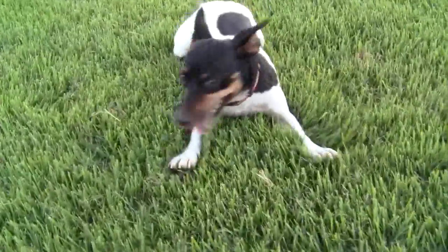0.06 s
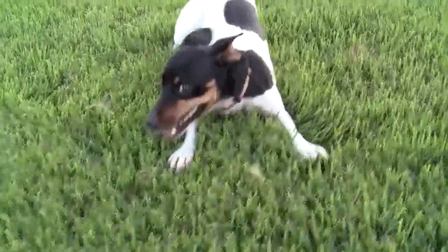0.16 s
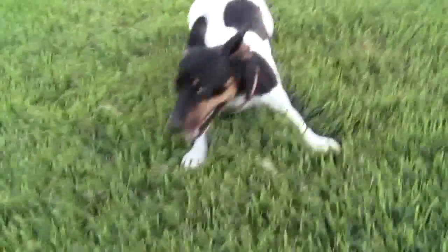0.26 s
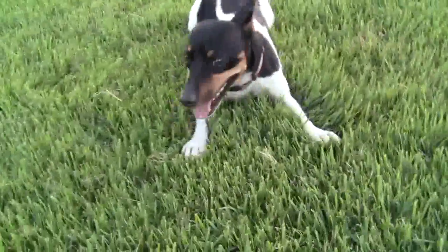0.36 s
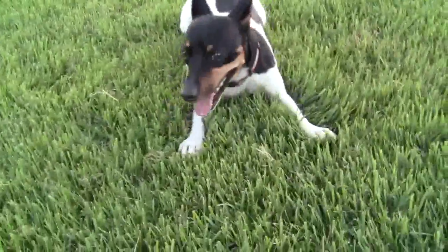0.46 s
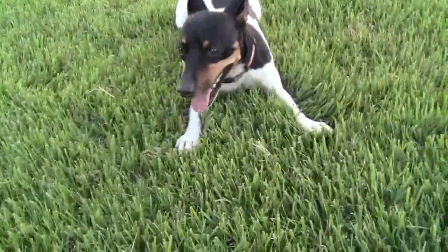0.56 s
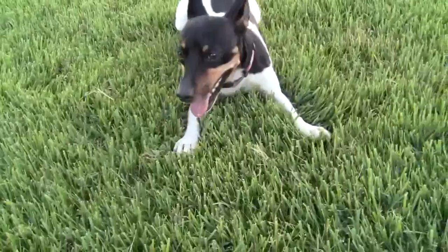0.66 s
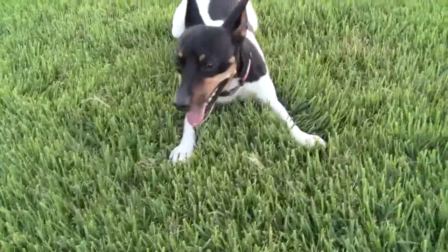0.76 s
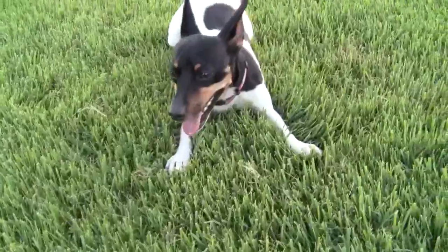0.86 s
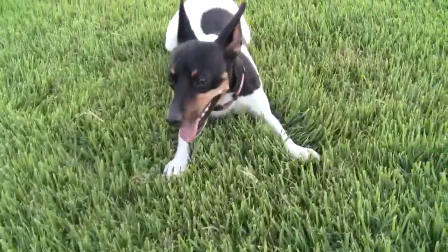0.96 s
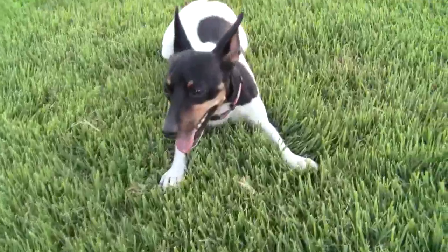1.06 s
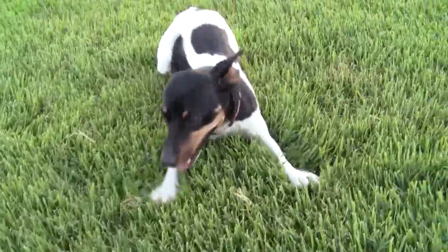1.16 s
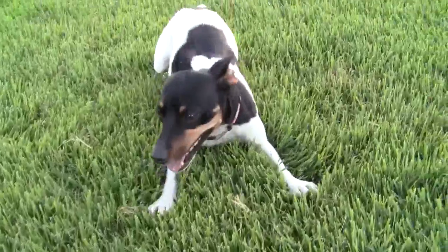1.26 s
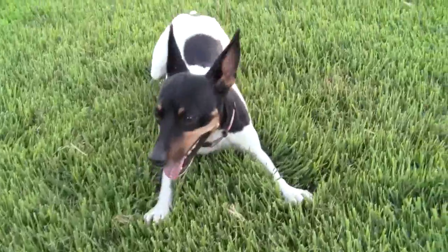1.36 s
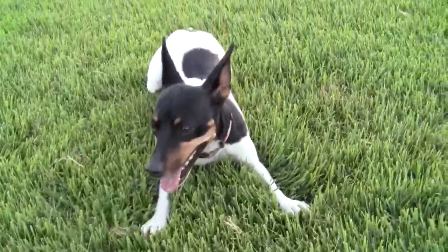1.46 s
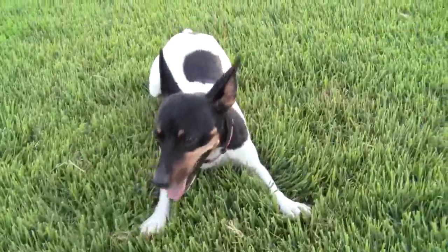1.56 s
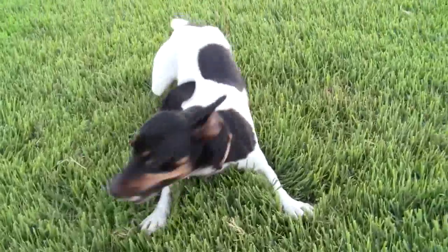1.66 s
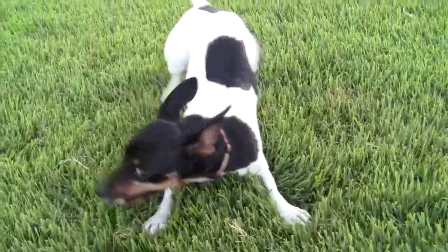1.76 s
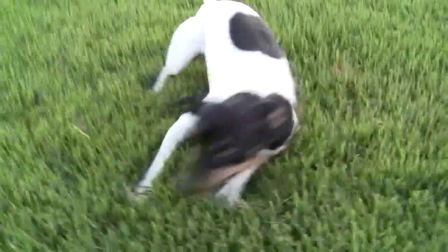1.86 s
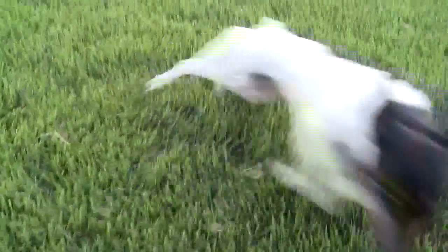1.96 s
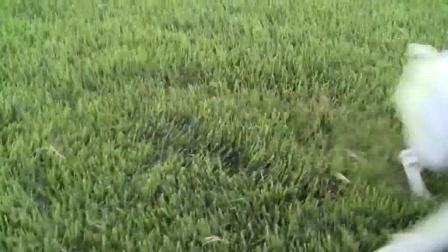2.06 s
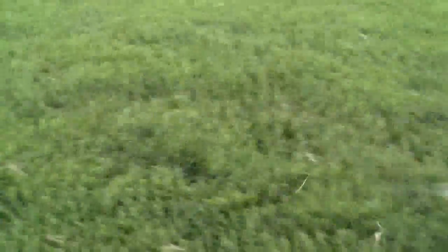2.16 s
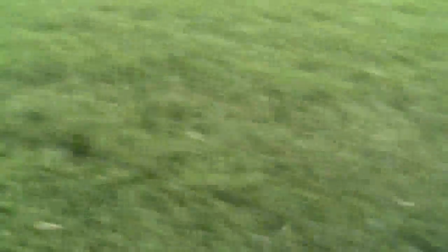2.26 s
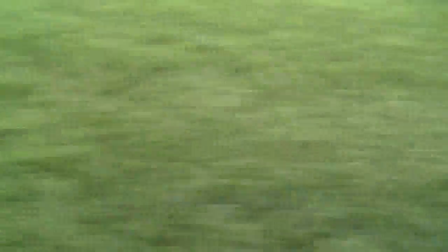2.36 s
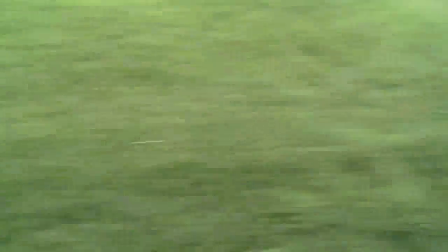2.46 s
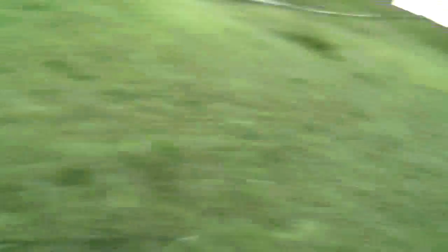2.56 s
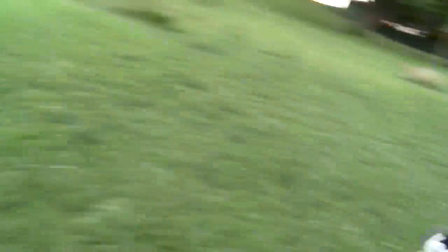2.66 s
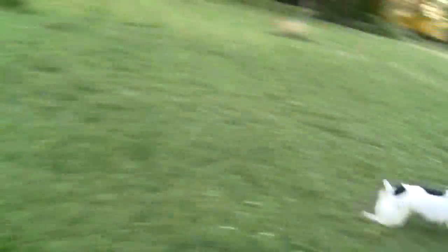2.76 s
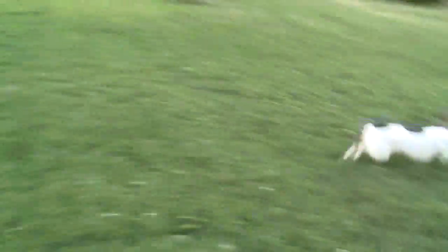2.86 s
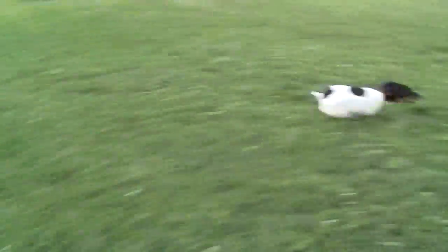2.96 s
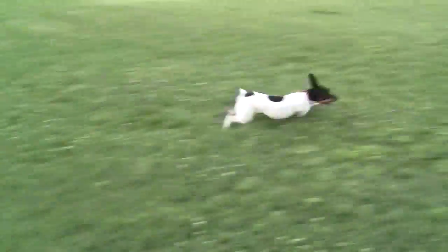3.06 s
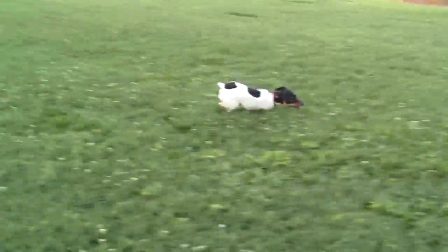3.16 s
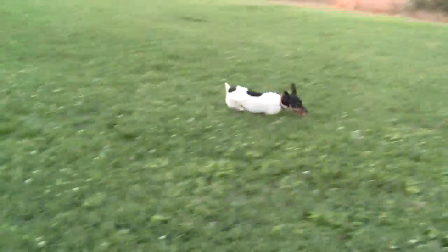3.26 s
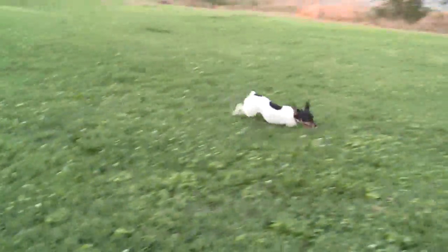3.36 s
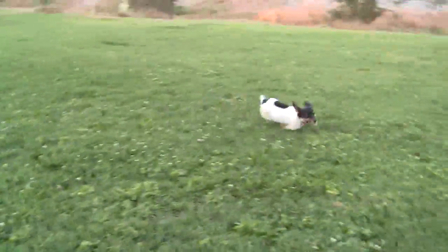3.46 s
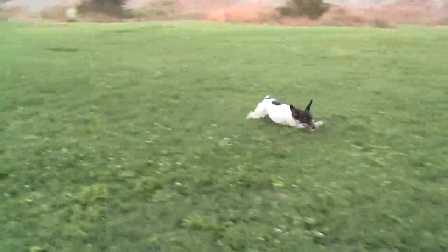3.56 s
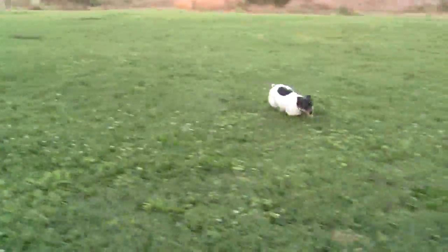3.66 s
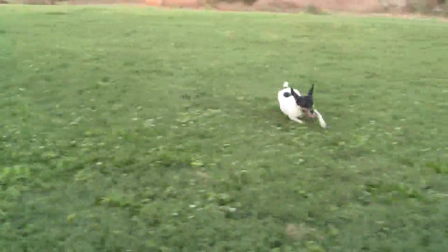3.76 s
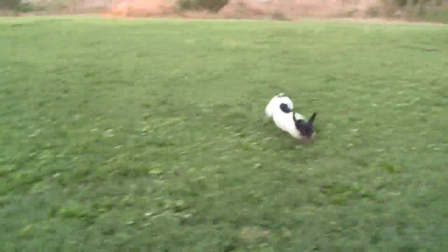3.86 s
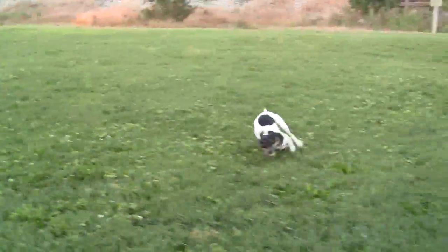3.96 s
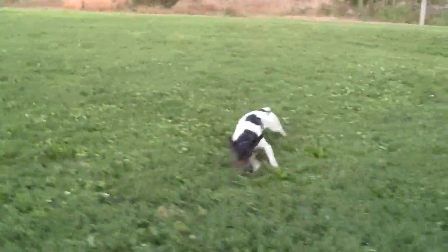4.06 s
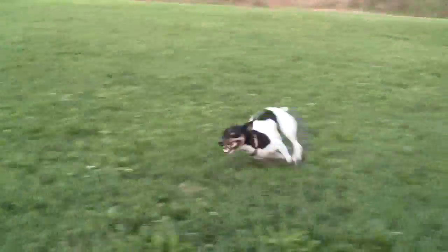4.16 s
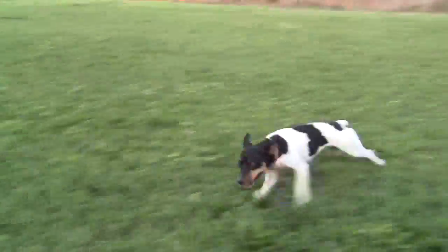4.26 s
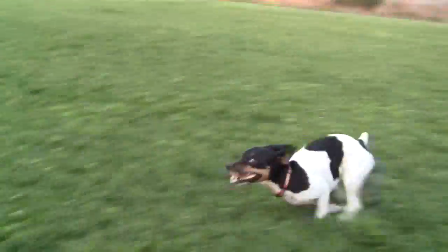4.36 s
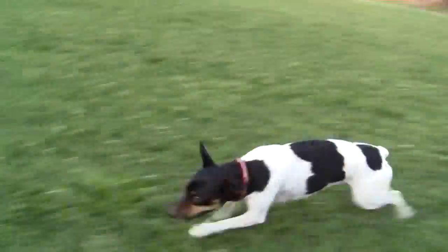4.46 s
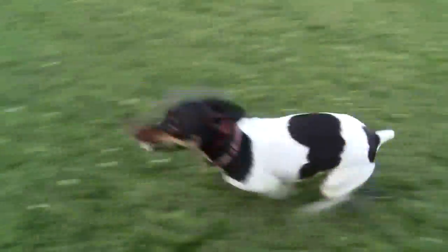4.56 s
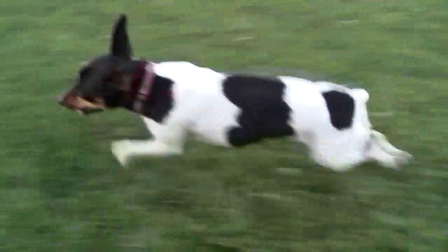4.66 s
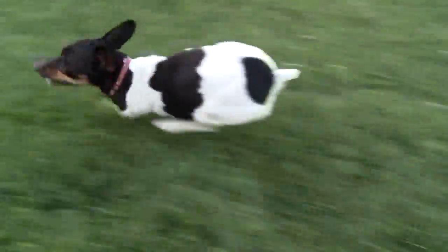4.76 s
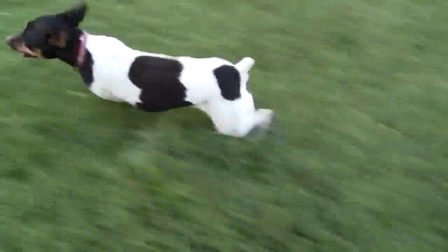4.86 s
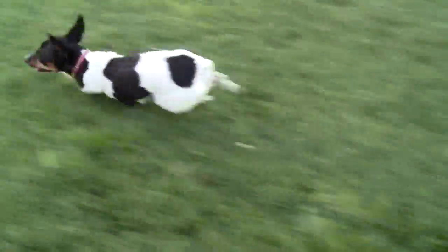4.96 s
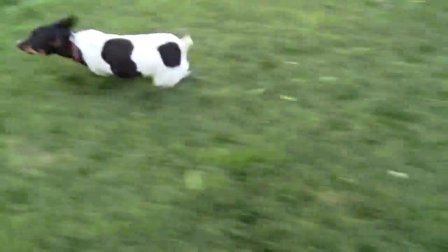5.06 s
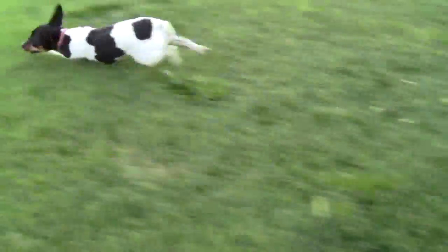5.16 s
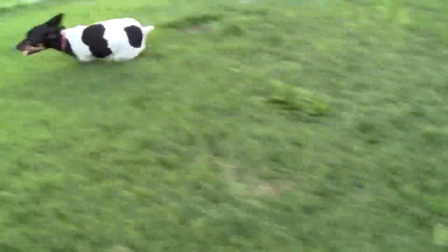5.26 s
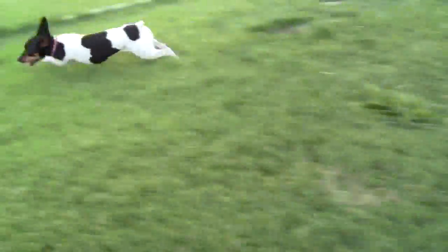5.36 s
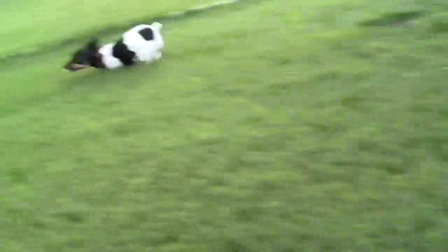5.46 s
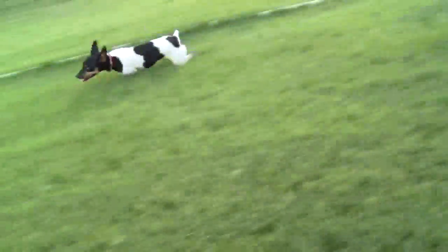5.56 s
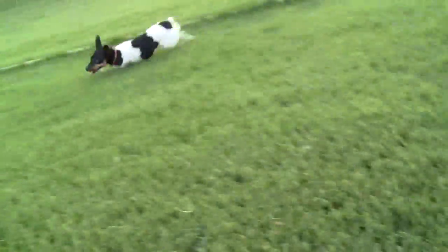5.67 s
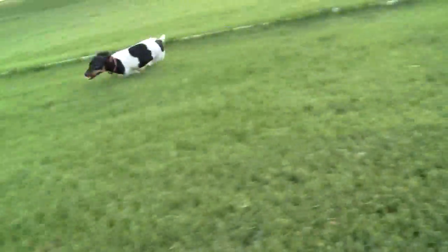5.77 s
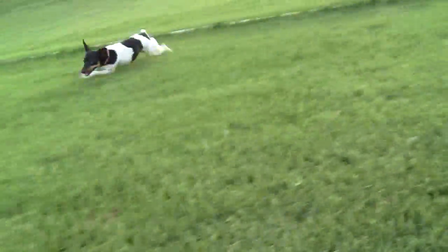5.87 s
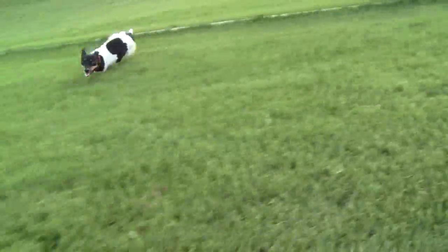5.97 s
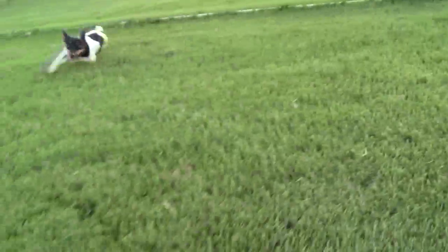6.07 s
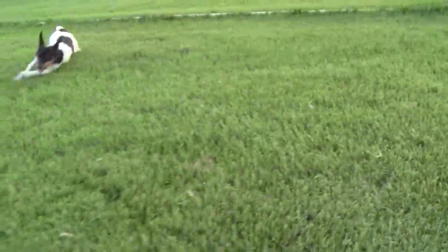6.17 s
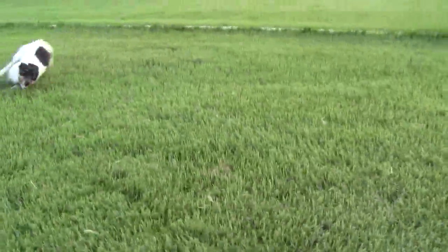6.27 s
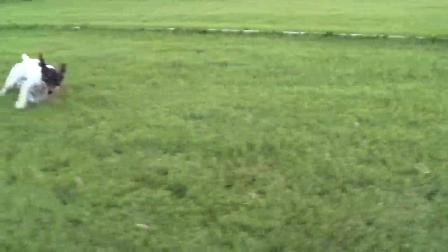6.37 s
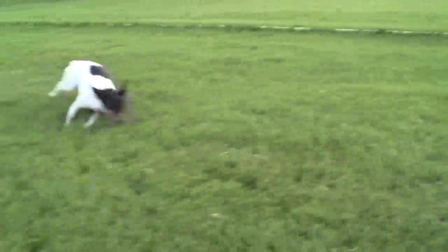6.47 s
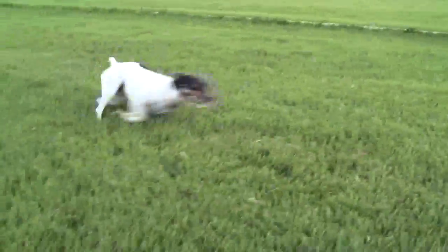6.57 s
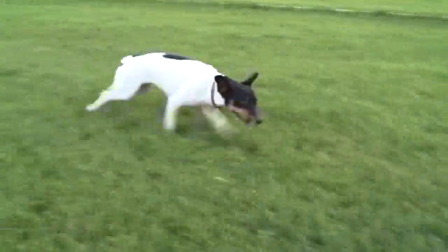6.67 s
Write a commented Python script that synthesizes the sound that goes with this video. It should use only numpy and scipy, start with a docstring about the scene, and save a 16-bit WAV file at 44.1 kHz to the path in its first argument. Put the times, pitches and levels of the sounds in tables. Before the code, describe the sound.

A small dog huffs on a lawn, gives one short gruff growl, then gallops through crackling grass as wind buffets the microphone.

```python
"""A small dog plays on a lawn: it huffs, lunges with one gruff growl, then gallops about, huffing as it runs.
Huffs are noise through airway resonances; the growl is rough pulses through the chest.
Grass crackles in tiny ticks and swishes as dull noise; stalks snap and the turf thuds.
Wind noise buffets the microphone in two spells as it swings after the dog.
A small bird twitters far away in gliding whistles, over a quiet bed of outdoor air."""
import sys
import numpy as np
from scipy import signal
from scipy.fft import rfft, irfft
from scipy.io import wavfile
from scipy.ndimage import uniform_filter1d, minimum_filter1d

SR = 44100
rng = np.random.default_rng(int(sys.argv[2]) if len(sys.argv) > 2 else 0)


def int16_out(signal):
    """Quantize to a 16-bit WAV file."""
    q = np.round(np.clip(np.atleast_2d(signal).T, -1, 1) * 32767)
    wavfile.write(sys.argv[1], SR, q.astype(np.int16))


N = 296773
TIME, HZ = np.arange(N) / SR, np.fft.rfftfreq(N, 1 / SR)

# The dog's huffs. Each row: peak in seconds, rise width in seconds, fall width in seconds, level in dB,
# mouth opening 0-1, throat against mouth in dB, teeth against mouth in dB.
HUFFS = [(0.186, 0.018, 0.02, -34, 0.24, -6, -4), (0.211, .0026, 0.013, -29.5, 0.076, -22, -9),
         (0.269, .003, .009, -37.5, 0.092, -13, -6.5), (0.386, 0.0031, .0045, -27, 0.13, -16, -16),
         (0.412, 0.017, .022, -26, 0.14, -9.5, -13), (0.643, .0055, .023, -52.5, .2, 0, -18),
         (1.293, 0.024, 0.0051, -37, 0.16, -8.5, -7.5), (1.339, .012, 0.049, -47.5, .1, -17, -6),
         (1.462, 0.0055, 0.041, -37.5, 0.29, -4.5, -12), (1.726, 0.0067, .0085, -25.5, 0.26, -14, -3.5),
         (1.767, 0.0084, 0.022, -23.5, 0.22, -15, -10.5), (1.81, 0.0068, 0.018, -21, .4, -1.5, -7.5),
         (1.867, 0.018, 0.017, -20.5, 0.47, -21, -14), (1.889, 0.0036, 0.017, -23.5, 0.12, -7, -18),
         (2.07, 0.0086, 0.019, -27.5, 0.3, -24, -4), (2.22, .009, 0.019, -24, 1, -15, -15),
         (2.847, 0.017, 0.012, -37.5, 0.017, -11, -18), (3.099, .019, .02, -30.5, 0.15, -11.5, -15),
         (3.313, 0.019, 0.041, -37, .6, -10, -3), (3.512, 0.0022, 0.028, -36.5, 0.064, -12, -7.5),
         (3.748, .015, 0.016, -43, 0.071, -16, -13), (3.989, .013, .033, -37.5, .15, -10, -5.5),
         (4.069, .01, .011, -40.5, .1, -5, -1), (4.292, .015, .016, -37.5, .16, -4, -12),
         (4.677, 0.035, 0.021, -38, 0.032, -9, -14), (4.944, 0.013, 0.0092, -20, 0.53, -26, -16.5),
         (5.142, .004, 0.025, -25.5, 0.63, -11.5, -9), (5.37, .038, 0.028, -41, .05, 0, -2),
         (5.638, .034, .012, -34.5, 0.97, -8, -11), (5.882, .029, .019, -40, 0.059, -9.5, -7.5),
         (6.06, 0.0025, 0.028, -39.5, 0.014, -25, -10), (6.298, 0.0038, 0.011, -26.5, 0.17, -32, -4),
         (6.318, .002, 0.021, -29.5, 0.13, -25, -4.5), (6.359, 0.013, 0.056, -36, .7, -31, -11),
         (6.617, .004, 0.0045, -30.5, 0.23, -25, -1), (6.626, 0.017, 0.017, -36.5, .05, -26, -8),
         (6.676, 0.018, .016, -38, 0.02, -8, -9)]
# How the upper mouth resonance balances the lower: it leads with the jaw shut and is weakest half open.
# Each row: mouth opening 0-1, upper against lower in dB.
UPPER_SHARE = [(0, 12), (.3, 1), (.47, -30), (.6, -8.5), (1, -7)]
# The two mouth resonances climb as the jaw opens: (shut, wide open) in Hz.
LOWER_HZ, UPPER_HZ, UPPER_BEND = (1504, 2110), (2148, 3060), 1.7
# Throat resonances. Each row: centre in Hz, width in Hz, level in dB.
THROAT = [(536, 140, 7), (894, 170, 0)]
# The growl's course. Each row: time in seconds, level in dB, mean pitch in Hz.
GROWL = [(1.742, -66, 122.5), (1.752, -27, 125), (1.778, -24, 138.7), (1.788, -20, 150),
         (1.818, -17.5, 163.6), (1.84, -21.5, 155.3), (1.866, -21.5, 135.4), (1.882, -32, 115),
         (1.9, -36, 100)]
# Chest and throat resonances of the growl. Each row: centre in Hz, width in Hz, level in dB.
CHEST = [(212, 71, -0.5), (328, 170, -0.5), (493, 150, -11.5), (690, 140, -14), (990, 330, -19)]
# Nose resonances of the sniff. Each row: centre in Hz, width in Hz, level in dB.
NOSE = [(1360, 400, -3), (4390, 900, 0), (5700, 1200, -14)]
# Steady rustle of the grass. Each row: time in seconds, level in dB before the colour's make-up gain.
RUSTLE = [(0.0, -72), (0.15, -51), (0.28, -65), (0.52, -69), (1.2, -66), (1.37, -53.5), (1.76, -64.5),
          (1.93, -39), (2.38, -37), (2.77, -43.5), (3.75, -48.5), (4.22, -45.5), (4.52, -40), (5.23, -45),
          (5.9, -52.5), (6.22, -54), (6.54, -45), (6.73, -43)]
# Brief dips in the rustle. Each row: centre in seconds, width in seconds, depth in dB.
LULLS = [(1.675, 0.029, -3), (2.02, 0.0087, -3), (2.145, 0.0093, -4.5), (4.456, 0.0094, -5),
         (4.575, 0.014, -8), (4.859, 0.018, -11.5)]
# Paws and feet sweeping through the blades. Each row: peak in seconds, length (rise plus fall width)
# in seconds, level in dB before the colour's make-up gain.
STROKES = [(0.15, 0.11, -45), (0.305, .035, -41.5), (0.38, 0.083, -45), (1.314, 0.079, -48.5),
           (1.787, 0.073, -38.5), (1.87, 0.023, -36), (2.052, 0.033, -30.5), (2.207, 0.049, -29),
           (2.353, 0.056, -34.5), (2.5, 0.088, -37), (2.576, 0.046, -33), (2.83, 0.026, -36),
           (3.064, .06, -42), (3.18, 0.17, -43), (4.327, 0.039, -36.5), (4.492, 0.02, -39),
           (4.62, 0.039, -36), (4.677, 0.031, -34), (4.745, 0.013, -40.5), (4.804, 0.019, -33.5),
           (4.971, 0.071, -36), (5.17, 0.078, -37), (5.363, 0.12, -47), (5.637, 0.063, -46.5),
           (6.106, 0.025, -52), (6.373, 0.18, -44), (6.643, .06, -45)]
# The action moves out on the lawn. Each row: time in seconds, share of the far colour 0-1.
AWAY = [(2.55, 0.03), (2.8, 0.94)]
# Colour of the grass close by. Each row: frequency in Hz, relative density in dB per Hz.
GRASS_NEAR = [(59, -15), (100, -0.5), (199, -2), (224, -7), (280, -3), (493, -5.5), (769, -3.5),
              (961, -5.5), (1110, -3.5), (1250, -4), (4740, -8), (8870, -4), (12500, -14), (16200, -44),
              (22000, -120)]
# Colour of the grass out on the lawn. Each row: frequency in Hz, relative density in dB per Hz.
GRASS_FAR = [(120, -23), (200, -1.5), (414, -1.5), (509, -1), (1130, -5.5), (1230, -3), (2540, -7),
             (4130, -6.5), (4660, -6), (6710, -9), (9310, -2), (10300, -6), (12500, -24.5), (16200, -59),
             (22000, -120)]
# Single stalks snapping. Each row: start in seconds, level in dB, decay time constant in seconds.
SNAPS = [(2.037, -28, .006), (2.56, -22, 0.0098), (3.398, -43, 0.0027), (3.937, -27.5, 0.0015),
         (3.968, -34.5, .003), (4.171, -34, 0.0037), (4.219, -32, 0.007), (4.325, -28.5, 0.0055),
         (4.418, -24.5, 0.0037), (4.488, -31, 0.0074), (4.512, -31.5, 0.0054), (4.606, -27, .012),
         (4.697, -25.5, .006), (4.971, -29, .005), (5.231, -34, .003)]
# Soft thuds on the turf, and one deeper low bump just after 0.23 s. Each row: start in seconds, level in dB,
# pitch in Hz.
THUDS = [(.208, -38, 127), (.232, -40, 55), (0.654, -46, 148), (1.009, -47, 186), (2.199, -35, 170),
         (3.497, -30.5, 166), (6.332, -32, 217)]
# Dull swish of running through the grass. Each row: time in seconds, level in dB before the trim.
SWISH = [(0, -56), (1.2, -58.5), (2.2, -51), (3.3, -47.5), (3.7, -48), (5.3, -45.5), (5.6, -54.5),
         (6.2, -42), (6.73, -59)]
# Colour of the swish. Each row: frequency in Hz, relative density in dB per Hz.
SWISH_COLOUR = [(35, -40), (60, -35), (107, -39), (144, -8.5), (326, -3), (476, -7.5), (882, -7),
                (1100, -14), (1290, -10.5), (7000, -19), (9100, -49), (15400, -120)]
# Stereo likeness of the swish. Each row: frequency in Hz, left-right correlation -1 to 1.
SWISH_SAME = [(80, 1), (300, 0.99), (650, 0.99), (1400, 1), (2800, 1)]
# Gusts over the microphone. Each row: start in seconds, end in seconds, level in dB before the trim,
# air speed 0-1.
GUSTS = [(2.49, 2.63, -33, 0), (2.768, 2.875, -28.5, 0.32), (3.016, 3.176, -32.5, 0.07),
         (4.532, 4.957, -17.5, 0.72), (5.03, 5.128, -37, 0.1)]
# Colour of slow air. Each row: frequency in Hz, relative density in dB per Hz.
WIND_SLOW = [(25, -49), (50, -11.5), (95, -1), (200, -1.5), (280, -6), (400, -20), (600, -31.5),
             (1000, -70), (2000, -102)]
# Colour of fast air. Each row: frequency in Hz, relative density in dB per Hz.
WIND_FAST = [(25, -44), (55, -25), (100, -18), (170, 1), (350, -1), (500, -7), (700, -18), (1000, -26),
             (1500, -48), (3000, -94)]
# Stereo likeness of the wind. Each row: frequency in Hz, left-right correlation -1 to 1.
WIND_SAME = [(35, 0.66), (70, 0.57), (130, -0.19), (280, -0.67), (600, -0.6), (1300, -0.14)]
# Single hard eddies in the gusts. Each row: peak in seconds, width in seconds, level in dB before the trim,
# brightness 0-1.
BUFFETS = [(2.535, 0.025, -18.5, 0), (2.708, 0.019, -11.5, 0.05), (2.795, 0.021, -20.5, 0.12),
           (2.84, 0.015, -29, .5), (2.88, 0.0063, -26.5, 0.03), (2.926, 0.0064, -23, .1),
           (3.025, 0.011, -20.5, 0.08), (3.105, 0.031, -25, 0), (4.563, 0.0092, -15, 0.6),
           (4.664, 0.0053, -13.5, 1), (4.771, 0.0092, -11.5, 0.87), (4.82, 0.0067, -13.5, 0.86),
           (4.886, 0.0067, -16.5, 0.83), (4.926, 0.0057, -14.5, 0.86), (4.975, 0.0063, -13, 0.13),
           (5.022, 0.013, -26, 0.14)]
# Colour of a bright eddy. Each row: frequency in Hz, relative density in dB per Hz.
BUFFET_COLOUR = [(40, -33), (150, 3), (400, 3.5), (800, -8), (1200, -21), (2000, -41), (4000, -104)]
# The bird's falling phrase: an arched note, a falling note, then a lower arched note. Each row:
# delay in seconds, length in seconds, start in Hz, middle in Hz, end in Hz (all before the song's factors),
# level in dB against the song.
PHRASE = [(0, .026, 4300, 4760, 4450, -4.5), (0.02, 0.021, 4440, 3920, 3850, 0.5),
          (0.046, .045, 3060, 3660, 3100, -4.5)]
# Each time the bird sings. Each row: start in seconds, pitch factor, duration factor,
# level in dB before the trim.
SONGS = [(0.028, 0.88, 1.36, -40.5), (0.515, 1.1, 1.2, -52), (0.665, 0.88, 0.82, -53),
         (0.795, .94, .7, -51), (0.868, .96, 1.2, -47.5), (1.545, 0.98, 1.1, -41), (3.405, 1.02, 0.91, -41),
         (3.6, 1, 0.88, -42.5), (4.33, 0.94, 1.0, -38), (5.7, 0.96, 1.1, -37)]
# Colour of the outdoor background. Each row: frequency in Hz, relative density in dB per Hz.
AIR = [(25, -20), (60, 0), (110, 0), (180, -1.5), (280, -10), (600, -9), (1200, -14.5), (2600, -20),
       (4300, -16.5), (5200, -30.5), (10000, -32.5), (12500, -38)]
# Stereo likeness of the background. Each row: frequency in Hz, left-right correlation -1 to 1.
AIR_SAME = [(60, 0.95), (130, 1), (280, .15), (600, 0.11), (1300, 0.8), (2800, 0.95), (5000, 0.99)]


def gain_of(db):
    """Decibels to amplitude."""
    return 10 ** (np.asarray(db) / 20)


def evened(x):
    """Scales to an rms of one."""
    return x / np.sqrt(np.mean(x ** 2) + 1e-20)


def read(points, hz):
    """Reads a spectrum table on a log-frequency axis."""
    f, value = np.transpose(points)
    return np.interp(np.log(hz + 1), np.log(f + 1), value)


def curve(rows, t=TIME):
    """Reads every column of a control table at the times t."""
    s, *columns = np.transpose(rows)
    return [np.interp(t, s, c) for c in columns]


def add(mix, s, sound):
    """Mixes a sound in at s seconds."""
    part = mix[max(round(s * SR), 0):][:len(sound)]
    part += sound[:len(part)]


def coloured(x, spectrum):
    """Gives a full-length signal a spectrum at an rms of one."""
    return evened(irfft(rfft(x) * gain_of(read(spectrum, HZ)), N))


def resonate(x, modes):
    """Passes x through parallel resonances with steep skirts and little deep bass."""
    hz = np.fft.rfftfreq(len(x), 1 / SR)
    shape = sum(gain_of(db) / (1 + ((hz - f) / width) ** 2) ** 2 for f, width, db in modes)
    bass_cut = hz ** 4 / (hz ** 4 + 130 ** 4)
    return evened(irfft(rfft(x) * shape * bass_cut, len(x)))


def wander(count, rate_hz):
    """Smooth random drift of rms one, its speed limited by rate_hz."""
    hz = np.fft.rfftfreq(count, 1 / SR)
    smoothing = np.exp(-(hz / rate_hz) ** 2) * (hz > 0)
    return evened(irfft(rfft(rng.standard_normal(count)) * smoothing, count))


def noise_pair(likeness):
    """White noise at two microphone ports, alike by band."""
    same = np.clip(read(likeness, HZ), -1, 1)
    mid, side = rfft(rng.standard_normal((2, N))) * np.sqrt([1 + same, 1 - same])
    return irfft(np.array([mid + side, mid - side]), N)


def steadied(x, size):
    """Takes the slow chance swells out of a noise, so that a control alone sets its level."""
    power = uniform_filter1d(np.atleast_2d(x ** 2).mean(0), size)
    return x / np.sqrt(uniform_filter1d(power, size) + 1e-12)


def swell(t, rise, fall, firmness=2):
    """A rounded rise to one at t = 0 and a fall; firmer is flatter on top."""
    distance = abs(t / np.where(t < 0, rise, fall))
    return np.exp(-.5 * np.minimum(distance, 30) ** firmness)


def panned(db):
    """Gains of the two ports for a left-minus-right level."""
    return gain_of(np.array([[db], [-db]]) / 2)


def huffs(mouth_width_hz=390, upper_width_hz=400, teeth_hz=3940, teeth_width_hz=900, leak_db=-20,
          flutter_db=3.0, flutter_hz=170, firmness=1.84):
    """Turbulent air rings throat, mouth and teeth; loose lips and tongue make it flutter."""
    out, t = np.zeros(N), np.arange(-8192, 8192) / SR
    for s, rise, fall, db, opening, throat_db, teeth_db in HUFFS:
        opening = np.clip(opening, 0, 1)
        lower_hz = np.interp(opening, [0, 1], LOWER_HZ)
        upper_hz = np.interp(opening ** UPPER_BEND, [0, 1], UPPER_HZ)
        upper_db = np.interp(opening, *np.transpose(UPPER_SHARE))
        low, mid, high, wide = rng.standard_normal((4, len(t)))
        air = resonate(mid, [(lower_hz, mouth_width_hz, 0), (upper_hz, upper_width_hz, upper_db)])
        air += gain_of(throat_db) * resonate(low, THROAT)
        air += gain_of(teeth_db) * resonate(high, [(teeth_hz, teeth_width_hz, 0), (5700, 1200, -11)])
        air += gain_of(leak_db) * resonate(wide, [(2850, 570, 0)])  # a little broad hiss leaks out
        air = steadied(air * gain_of(flutter_db * wander(len(t), flutter_hz)), size=400)
        add(out, s + t[0], gain_of(db) * swell(t, rise, fall, firmness) * air)
    return out


def growl(rough=0.66, jitter=.18, puff_share=0.78):
    """Uneven slaps of the vocal folds, each with a puff of air, ring the chest and throat."""
    t = np.arange(GROWL[0][0], GROWL[-1][0], 1 / SR)
    db, hz = curve(GROWL, t)
    turns = np.cumsum(hz * (1 + jitter * wander(len(t), 90))) / SR
    slaps = np.diff(np.floor(turns), prepend=0) * gain_of(1.4 * wander(len(t), 120))
    # each puff fades over a share of the fold's cycle
    puffs = np.exp(-(turns % 1) / puff_share) * rng.standard_normal(len(t))
    voice = resonate((1 - rough) * evened(slaps) + rough * evened(puffs), CHEST)
    out = np.zeros(N)
    add(out, t[0], gain_of(db) * steadied(voice, size=500))
    return out


def sniff(peak_s=.877, width_s=0.0086, level_db=-43.5):
    """One quick, thin puff of noise through the resonances of the dog's nose."""
    puff = resonate(rng.standard_normal(N), NOSE)
    return gain_of(level_db) * swell(TIME - peak_s, width_s, width_s) * puff


def grass(ticks_per_s=2600, rub=0.76, clump_db=1.2, clump_hz=70, uneven_db=1.28, uneven_hz=14,
          rise_share=0.45, firmness=1.6, near_gain_db=3.5, far_gain_db=3.0):
    """Blades flick free in clumps of tiny ticks over a smooth rub; foot strokes swell above the rustle."""
    ticks = (rng.random(N) < ticks_per_s / SR) * rng.choice([-1, 1], N)
    blades = evened(ticks) + rub * rng.standard_normal(N)
    blades *= gain_of(clump_db * wander(N, clump_hz))

    bed_db, = curve(RUSTLE)
    bed_db = bed_db + sum(db * swell(TIME - s, width, width) for s, width, db in LULLS)
    power = gain_of(bed_db + uneven_db * wander(N, uneven_hz)) ** 2
    t = np.arange(-8192, 8192) / SR
    for s, length, db in STROKES:
        sweep = swell(t, rise_share * length, (1 - rise_share) * length, firmness)
        add(power, s + t[0], (gain_of(db) * sweep) ** 2)

    away, = curve(AWAY)
    away = np.clip(away, 0, 1)
    near = gain_of(near_gain_db) * coloured(blades, GRASS_NEAR)
    far = gain_of(far_gain_db) * coloured(blades, GRASS_FAR)
    return np.sqrt(power) * ((1 - away) * near + away * far)


def steps(thud_decay_s=0.0072, thud_rise_s=0.002):
    """Stalks snap in short bright bursts; the turf gives damped thuds, and one deeper low bump sounds early on."""
    out, t = np.zeros(N), np.arange(4096) / SR
    for s, db, decay in SNAPS:
        burst = resonate(rng.standard_normal(len(t)), [(4230, 3900, -1.5), (8960, 1900, 6)])
        add(out, s, gain_of(db) * burst * np.exp(-t / decay))
    for s, db, hz in THUDS:
        push = (1 - np.exp(-t / thud_rise_s)) * np.exp(-t / thud_decay_s)
        soil = np.sin(2 * np.pi * hz * t)
        soil += .5 * resonate(rng.standard_normal(len(t)), [(200, 210, 0)])
        add(out, s, gain_of(db) * push / push.max() * soil)
    return out


def swish(lumps_db=2.0, lumps_hz=35, trim_db=-2):
    """The dull brushing of legs through the lawn: lumpy filtered noise."""
    db, = curve(SWISH)
    level = gain_of(db + trim_db + lumps_db * wander(N, lumps_hz))
    return level * coloured(noise_pair(SWISH_SAME), SWISH_COLOUR)


def wind(eddy_db=2.9, eddy_hz=55, attack_s=0.031, release_s=0.029, slow_pan_db=2.0, fast_pan_db=-3.0,
         trim_db=4):
    """Eddies press on the two ports, partly in opposition; faster air sheds smaller, brighter eddies."""
    eddies = noise_pair(WIND_SAME) * gain_of(eddy_db * wander(N, eddy_hz))
    force, speed = np.zeros((2, N))
    for start, end, db, top_speed in GUSTS:
        before, after = np.maximum(start - TIME, 0), np.maximum(TIME - end, 0)
        blowing = np.exp(-before / attack_s - after / release_s)
        force += gain_of(db + trim_db) * blowing
        speed += np.clip(top_speed, 0, 1) * blowing  # weak air stays dull
    slow = panned(slow_pan_db) * coloured(eddies, WIND_SLOW)
    fast = panned(fast_pan_db) * coloured(eddies, WIND_FAST)
    return force * steadied((1 - speed) * slow + speed * fast, size=600)


def buffets(bright_pan_db=-3, trim_db=3):
    """A hard eddy hits the ports as one bump of noise, blended from a dull and a bright colour."""
    eddies, out = noise_pair(WIND_SAME), np.zeros((2, N))
    dull = steadied(coloured(eddies, WIND_SLOW), size=400)
    bright = panned(bright_pan_db) * steadied(coloured(eddies, BUFFET_COLOUR), size=400)
    for s, width, db, brightness in BUFFETS:
        share = np.clip(brightness, 0, 1)
        bump = gain_of(db + trim_db) * swell(TIME - s, width, width)
        out += bump * ((1 - share) * dull + share * bright)
    return out


def whistle(length, pitches_hz, quaver_db=3):
    """One slightly burry note gliding through a start, a middle and an end pitch."""
    u = np.linspace(0, 1, round(length * SR))
    glide = np.polyval(np.polyfit([0, .5, 1], pitches_hz, 2), u)
    hz = glide * (1 + .028 * wander(8192, 450)[:len(u)])
    quaver = gain_of(quaver_db * wander(8192, 90)[:len(u)])
    return quaver * abs(np.sin(np.pi * u)) ** .5 * np.sin(2 * np.pi * np.cumsum(hz) / SR)


def bird(twitter_per_s=10, twitter_hz=4100, twitter_spread=0.15, twitter_s=0.043, twitter_db=-59,
         echo_s=.022, echo_db=-6, trim_db=-4.0):
    """A quick three-note phrase and stray twitters, smeared by their way across the garden."""
    out = np.zeros(N)
    tail = rng.standard_normal(SR // 4) * np.exp(-TIME[:SR // 4] / echo_s)
    for s, pitch, stretch, song_db in SONGS:
        for delay, length, *pitches_hz, db in PHRASE:
            note = whistle(stretch * length, pitch * np.array(pitches_hz))
            add(out, s + stretch * delay, gain_of(song_db + db + trim_db) * note)
    for s in np.arange(0, TIME[-1], 1 / twitter_per_s):
        # one shift for the whole note, and one for each of its three pitches
        shift = rng.uniform(-0.967, 1) + rng.uniform(-0.99, 1, size=3)
        note = whistle(twitter_s, twitter_hz * (1 + twitter_spread * shift))
        add(out, s + rng.random() / twitter_per_s, gain_of(twitter_db) * note)
    return out + gain_of(echo_db) * signal.fftconvolve(out, tail / np.linalg.norm(tail))[:N]


def outdoor_air(level_db=-52.5):
    """The steady outdoor hush: wide, filtered noise."""
    return gain_of(level_db) * coloured(noise_pair(AIR_SAME), AIR)


def scene():
    """Dog, crackling grass, steps and bird sit dead centre; swish, wind and air are stereo."""
    dog = huffs() + growl() + sniff()
    lawn = grass() + steps() + swish()
    return dog + lawn + wind() + buffets() + bird() + outdoor_air()


def record(dry, low_cut_hz=29, edge_hz=12150):
    """A low cut; a fast limiter that holds the peaks under full scale; then a treble band limit."""
    dry = irfft(rfft(dry) * HZ ** 4 / (HZ ** 4 + low_cut_hz ** 4), N)
    peak_db = 20 * np.log10(abs(dry).max(0) + 1e-9)
    recovery_db = 500 * TIME  # the limiter lets go at 500 dB per second
    held_peak_db = np.maximum.accumulate(peak_db + recovery_db) - recovery_db
    over_db = np.maximum(held_peak_db + .5, 0)  # half a dB of headroom
    limit_db = uniform_filter1d(minimum_filter1d(-over_db, size=61), size=61)
    held = dry * gain_of(limit_db)
    band_limit = signal.firwin(301, edge_hz, window=("kaiser", 9), fs=SR)
    return signal.oaconvolve(held, band_limit[None], "same")


dry = scene()
out = record(dry)
int16_out(out)
```